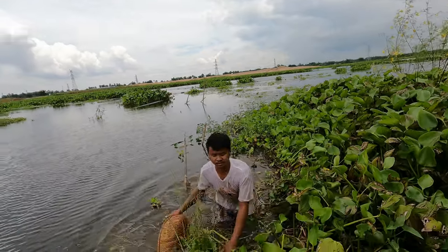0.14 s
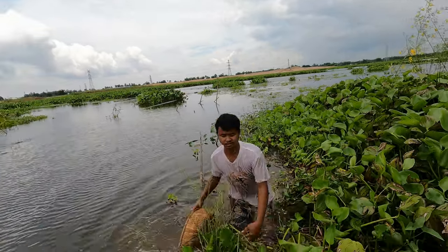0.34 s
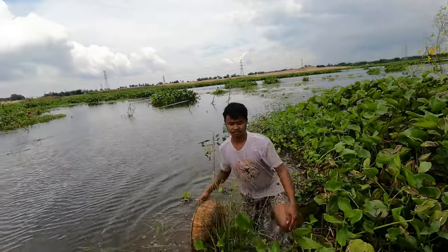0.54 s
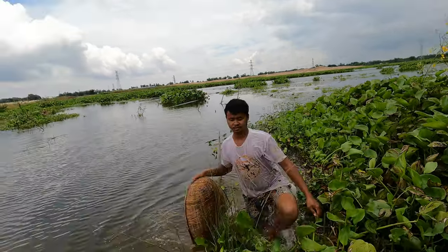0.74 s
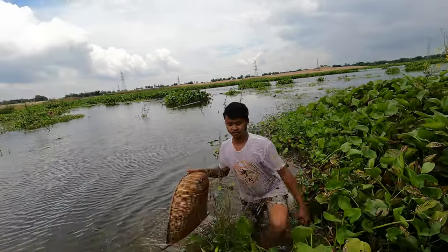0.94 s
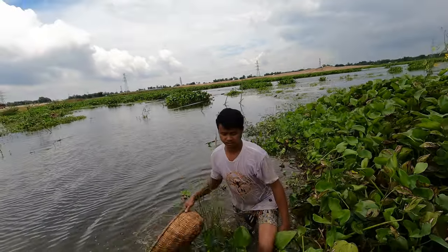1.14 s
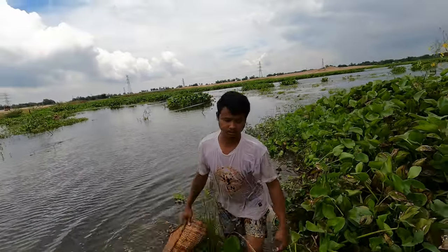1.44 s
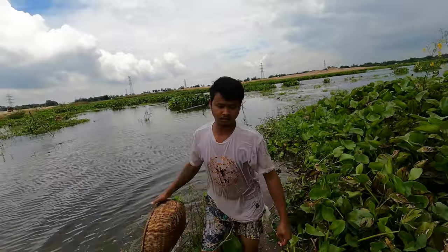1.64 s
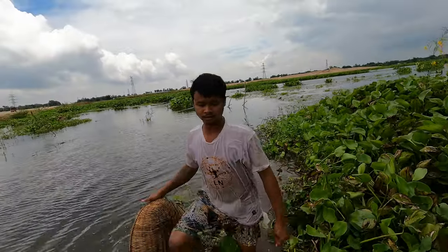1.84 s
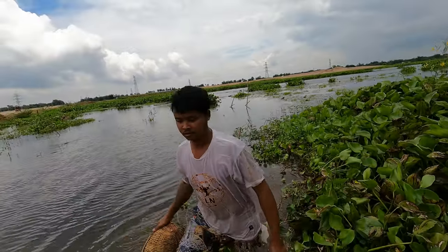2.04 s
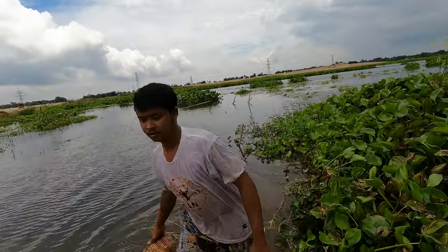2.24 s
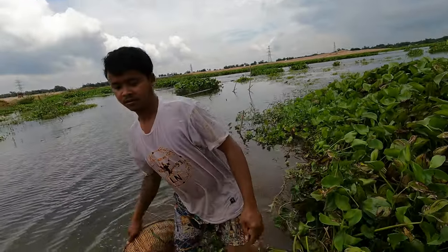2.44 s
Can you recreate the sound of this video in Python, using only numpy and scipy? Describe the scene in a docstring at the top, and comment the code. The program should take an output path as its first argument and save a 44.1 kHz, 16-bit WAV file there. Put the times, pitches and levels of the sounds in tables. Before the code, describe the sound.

Legs wade through shallow water, sloshing, gurgling and splashing unevenly over a low outdoor rumble.

```python
"""Someone wades through a shallow flooded field, over a low rumble and two wavering drones.
From the start the legs churn up clouds of ringing air bubbles, spray patters and fine drips tick.
Soon lumps of water slap the surface as short noise bursts, and single large bubbles plop as fading tones.
From about 0.8 s dull underwater thumps join in; they are lower bubble tones with a steady pitch."""
import sys
import numpy as np
from scipy import signal
from scipy.fft import rfft, irfft
from scipy.io import wavfile

SR = 44100
rng = np.random.default_rng(int(sys.argv[2]) if len(sys.argv) > 2 else 0)


def wav_out(sig):
    """Save sig, one row per channel (or a flat mono array), as 16-bit PCM at SR to the path in sys.argv[1]."""
    wavfile.write(sys.argv[1], SR, np.round(np.clip(np.atleast_2d(sig).T, -1, 1) * 32767).astype(np.int16))


N = 114660
TIME = np.arange(N) / SR
FREQ = np.fft.rfftfreq(N, 1 / SR)

# how strongly the water is stirred, before echo and panning:
# time_s, gurgle_level_db, slosh_level_db, spray_level_db
STIRRED_WATER = [(0.0, -53, -42.5, -43), (0.05, -55, -51.5, -49.5), (0.1, -52.0, -41, -45.5),
                 (0.12, -53.0, -44, -39), (0.17, -51.5, -46, -43), (0.27, -47.5, -40.0, -42.5),
                 (0.33, -50.5, -40.5, -46.5), (0.41, -54.0, -46, -50.0), (0.47, -47, -38, -44.5),
                 (0.51, -37, -41, -43), (0.55, -36.5, -34, -42.5), (0.61, -39.5, -33.5, -37),
                 (0.66, -34.5, -33, -34), (0.75, -40.5, -40, -37.5), (0.81, -42, -35.5, -37.5),
                 (0.88, -40, -38, -42), (0.97, -43, -39.5, -40.5), (1.08, -45.5, -41, -38.5),
                 (1.13, -50, -39.5, -39.5), (1.16, -47, -39, -39.5), (1.21, -52, -41, -39),
                 (1.27, -41, -35.0, -35.5), (1.35, -51, -43.5, -42), (1.47, -48, -43, -45.0),
                 (1.51, -51, -50, -47.5), (1.58, -54, -48, -47.5), (1.62, -45.5, -43, -48.5),
                 (1.7, -46.5, -46.5, -43), (1.75, -58, -36.5, -41), (1.8, -41, -34, -37),
                 (1.85, -49, -38, -38.5), (1.92, -42, -39, -35.5), (2.01, -41, -34.5, -31),
                 (2.06, -51, -40, -38.5), (2.11, -42.5, -36.5, -39), (2.17, -36, -37, -35),
                 (2.24, -53.5, -53.5, -40.5), (2.31, -56, -51, -45.5), (2.38, -43, -45.5, -48.5),
                 (2.44, -52, -49.0, -52.5), (2.49, -50, -50.5, -47.5), (2.52, -50, -42.5, -42.5),
                 (2.56, -56, -41.5, -47), (2.6, -43, -40, -41)]


def amp(db):
    """Turns decibels into a gain."""
    return 10 ** (np.asarray(db) / 20)


def unit(x):
    """Scales a sound to an rms (average strength) of 1."""
    return x / np.sqrt(np.mean(x ** 2) + 1e-20)


def curve(table, axis=1):
    """Draws straight lines through one column of a time table, giving a value for every sample."""
    rows = np.array(table)
    return np.interp(TIME, rows[:, 0], rows[:, axis])


def colour(x, shape):
    """Gives a sound the tone colour of a (pitch_hz, level_db) table, then scales it to rms 1."""
    hz, db = np.transpose(shape)
    gain_db = np.interp(np.log(FREQ + 1), np.log(hz), db)
    return unit(irfft(rfft(x) * amp(gain_db), N))


def drift(rate_hz):
    """Makes slow random motion of rms 1 by smoothing noise; a higher rate moves faster."""
    smoothing = np.exp(-(FREQ / rate_hz) ** 2)
    return unit(irfft(rfft(rng.standard_normal(N)) * smoothing, N))


def sides(pan_db):
    """Gives left and right gains; a positive level difference makes the left louder."""
    return amp(np.array([[.5], [-.5]]) * pan_db)


def add(mix, s, sound):
    """Mixes a sound in at time s, in seconds."""
    part = mix[..., max(round(s * SR), 0):][..., :sound.shape[-1]]
    part += sound[..., :part.shape[-1]]


def bubble(hz, cycles, rise):
    """A trapped air bubble rings and dies; its pitch may rise until it bursts at the surface."""
    onset_cycles, burst_after = 0.4, 2.8  # burst_after is in decay times
    u = TIME[:3000] * hz  # time counted in cycles
    age = u / cycles  # time counted in decay times
    fade = np.exp(-age) / np.hypot(1, (age / burst_after) ** 3)
    pitch_hz = hz * (1 + rise * np.minimum(age, 4))
    phase = 2 * np.pi * np.cumsum(pitch_hz) / SR
    return (1 - np.exp(-u / onset_cycles)) * fade * np.sin(phase)


def cloud(low_hz, high_hz, per_s, cycles, rise, spread_db, count=36):
    """Bubbles of many sizes and strengths ring together, born at random moments."""
    out = np.zeros(N)
    for hz in np.geomspace(low_hz, high_hz, count):
        length, glide = rng.standard_normal(2)
        born = rng.random(N) < per_s / count / SR
        strength = amp(spread_db * np.minimum(rng.exponential(1, N), 3))
        ring = unit(bubble(hz, cycles * np.exp(0.33 * length), rise * abs(glide)))
        out += signal.oaconvolve(born * strength, ring)[:N]
    return unit(out)


def churn():
    """Legs stir deep gurgles and a slosh of mid-sized bubbles, over a wash of countless tiny ones."""
    # tone colours of the gurgle and the slosh: pitch_hz, level_db (relative)
    gurgle_shape = [(150, -7), (280, 4.5), (500, 6.5), (700, 8.5), (1000, -21), (2000, -35)]
    slosh_shape = [(450, -11), (800, -5.5), (1050, 2), (1600, 0.5), (2400, -3), (3200, -5.5), (4500, -39.5),
                   (7000, -38)]
    wash_db = -6  # noise for the tiny bubbles, relative to each cloud before colouring
    gurgle = cloud(252.5, 827, per_s=320, cycles=1.1, rise=0.037, spread_db=3.5, count=16)
    gurgle += amp(wash_db) * rng.standard_normal(N)
    slosh = cloud(699, 4516, per_s=1900, cycles=5.1, rise=0.0974, spread_db=4, count=48)
    slosh += amp(wash_db) * rng.standard_normal(N)
    return (amp(curve(STIRRED_WATER, axis=1)) * colour(gurgle, gurgle_shape)
            + amp(curve(STIRRED_WATER, axis=2)) * colour(slosh, slosh_shape))


def spray():
    """Thrown droplets tick on the water in clumps and leave tiny ringing bubbles."""
    # tone colour of the spray: pitch_hz, level_db (relative)
    spray_shape = [(1000, -4), (2000, 6), (2800, -1), (4200, 0), (5500, -3), (7200, -4), (8500, -10.5),
                   (10500, -15.5), (12200, -13), (13500, -20), (15500, -46)]
    hits = rng.random(N) < 2600 / SR  # about 2600 droplets a second
    strength = amp(1.83 * np.minimum(rng.exponential(1, N), 3.6))
    ticks = hits * strength * rng.choice([-1, 1], N)
    fizz = cloud(2580, 9510, per_s=1300, cycles=8.3, rise=0.14, spread_db=1.5)
    hiss = rng.standard_normal((2, N))
    drops = unit(ticks) + amp(-2.5) * fizz + amp(-6) * hiss
    clumps = amp(1.8 * drift(70))
    return amp(curve(STIRRED_WATER, axis=3)) * colour(drops * clumps, spray_shape)


def drips():
    """Fine drips from wet clothes and a basket make tiny sharp ticks, each with a brief spatter."""
    # tone colour of the drips: pitch_hz, level_db (relative)
    drip_shape = [(1500, -27), (3500, 18), (6500, -1), (8500, -1), (10500, -7.5), (12200, 0), (13500, -27),
                  (15500, -24)]
    drips_per_s, spread_db, level_db, decay_s = 120, 3.8, -54.5, 0.0015
    strength = amp(spread_db * np.minimum(rng.exponential(1, N), 2.5))
    hits = (rng.random(N) < drips_per_s / SR) * strength
    fading = signal.lfilter([1], [1, -np.exp(-1 / (decay_s * SR))], hits)
    spatter = fading * rng.standard_normal(N)
    return amp(level_db) * colour(spatter, drip_shape)


def rumble():
    """Low outdoor rumble of shaped noise and two wavering sine drones, perhaps from a far engine."""
    # loudness of the sub-bass, the upper bass and the higher drone: time_s, level_db
    sub_level = [(0, -33.5), (.3, -34.5), (.55, -29), (.85, -26), (1.1, -29), (1.5, -27.5), (1.7, -27),
                 (2.2, -26), (2.42, -32.5), (2.52, -24), (2.6, -26.5)]
    bass_level = [(0, -31), (.1, -36.5), (.3, -32.5), (.45, -30.5), (.56, -36), (.68, -31.5), (.85, -30.5),
                  (1.1, -34), (1.22, -33.5), (1.5, -34.5), (1.7, -33.5), (1.86, -42), (2.0, -34),
                  (2.13, -34), (2.3, -35), (2.6, -36)]
    drone_level = [(0, -31), (.12, -31.5), (.19, -23), (.44, -33), (.53, -24), (.72, -22.5), (.93, -23.5),
                   (1.15, -31), (1.45, -30.5), (1.8, -32.5), (1.95, -32), (2.1, -31.5), (2.2, -28.5),
                   (2.38, -33), (2.6, -49)]
    # the deeper drone: time_s, pitch_hz, level_db
    deep_drone = [(0, 57.8, -28), (.14, 58.4, -26.5), (.24, 59, -33), (.4, 59, -26.5), (.6, 58.6, -37),
                  (1.5, 44.97, -39.5), (1.78, 34.56, -28), (1.95, 35.98, -27), (2.1, 40.3, -26.5),
                  (2.25, 35.2, -27), (2.42, 37, -36.5), (2.6, 39.9, -27)]
    # tone colours of the sub-bass and the upper bass: pitch_hz, level_db (relative)
    sub_shape = [(10, -58), (22, -0.5), (36, 3.5), (47, -4), (60, 4), (80, -12), (120, -7.5), (300, -66.5)]
    bass_shape = [(50, -53), (85, -14), (120, 1.5), (160, -5.5), (205, -5), (260, -14.5), (350, -26.5),
                  (700, -61.5)]
    # place of the sub-bass and deeper drone: time_s, left_minus_right_db
    sub_pan = [(0, 2.5), (.6, -5), (1.3, -2.5), (2, -7.5), (2.6, -3.5)]
    drone_hz = 93

    def noise(shape, apart_db):
        """Noise shared by both sides, plus some that differs between them."""
        shared = rng.standard_normal(N)
        return colour(shared + amp(apart_db) * rng.standard_normal((2, N)), shape)

    def tone(hz):
        """A sine of rms 1 whose pitch wavers at random."""
        wavering_hz = hz + 2.47 * drift(6.9)
        return np.sqrt(2) * np.sin(2 * np.pi * np.cumsum(wavering_hz) / SR)

    sub = amp(curve(sub_level)) * noise(sub_shape, apart_db=-5)
    sub += amp(curve(deep_drone, axis=2)) * tone(curve(deep_drone))
    bass = amp(curve(bass_level)) * noise(bass_shape, apart_db=-11.5) * sides(-1.3)
    drone = amp(curve(drone_level)) * tone(drone_hz)
    return sub * sides(curve(sub_pan)) + bass + drone


def slaps():
    """Lumps of water hit the surface with a short, bright splat of noise around one pitch."""
    # each slap: start_s, level_db (before the fades), centre_hz, decay_s
    slap_list = [(0.0209, -35.5, 4500, .003), (0.111, -35.5, 4830, .004), (0.193, -31.5, 5270, 0.0017),
                 (.446, -39, 5470, .0015), (0.527, -30, 2200, .004), (.533, -32, 5030, 0.0033),
                 (.642, -25.5, 3000, 0.0029), (.657, -26.5, 4000, .002), (0.67, -26.5, 2530, 0.0023),
                 (.8899, -31.5, 3600, 0.005), (1.1468, -27.5, 3320, 0.0069), (1.165, -30, 3430, 0.0051),
                 (1.268, -31.5, 4000, 0.0047), (1.47, -29.5, 2740, 0.0032), (1.642, -33.5, 3200, .002),
                 (1.7877, -26, 3200, .003), (1.8038, -25, 4440, 0.0026), (1.8095, -27, 7440, 0.0023),
                 (2.0083, -30, 2860, .009), (2.171, -25, 3650, 0.0032), (2.2252, -28, 5370, .002),
                 (2.2929, -22.5, 4000, 0.0046), (2.356, -30, 3215, 0.0023), (2.398, -27, 1320, 0.0031),
                 (2.5067, -34.5, 4955, 0.0047), (2.5145, -25, 3890, 0.0023), (2.5704, -32, 3900, 0.0028)]
    width_octaves, attack_s = 1, .0002
    out, t = np.zeros(N), TIME[:2048]
    octave = np.log2(np.fft.rfftfreq(len(t), 1 / SR) + 1)
    for start_s, level_db, centre_hz, decay_s in slap_list:
        distance = (octave - np.log2(centre_hz)) / width_octaves
        band = 1 / (1 + distance ** 2) ** 2
        burst = unit(irfft(rfft(rng.standard_normal(len(t))) * band))
        fade = np.exp(-t / decay_s) * (1 - np.exp(-t / attack_s))
        add(out, start_s, amp(level_db) * burst * fade)
    return out


def plops():
    """Large single bubbles ring and stand out of the slosh."""
    # each bubble: start_s, pitch_hz (at first), level_db (before the fades), decay_cycles,
    # pitch_rise (share of the first pitch per decay time)
    plop_list = [(0.0547, 1160, -28.5, 4, 0.0), (0.0799, 661, -34.5, 6.2, 0.43),
                 (0.2722, 2070, -24, 3.1, 0.14), (0.2915, 513, -25.5, 6.1, 0.3),
                 (0.335, 1048, -21.5, 6.3, 0.0), (0.3609, 1950, -28.5, 8.7, 0.04),
                 (0.4667, 1650, -23.5, 3.3, 0.057), (0.475, 670, -28, 3.8, 0.0031),
                 (0.5387, 1900, -19.5, 4.6, 0.08), (0.5551, 754, -21, 4.2, 0.25),
                 (0.5769, 2430, -25, 12, 0.0), (0.578, 530, -25, 10, 0.033),
                 (0.5891, 488, -14, 3.5, 0.0051), (0.6235, 320, -26, 2.3, 0), (0.6342, 1529, -21, 3.1, 0.0),
                 (0.6702, 1170, -20, 4, 0.0), (0.6793, 1590, -24, 7, 0.022),
                 (0.7017, 1616, -26, 6.2, 0.015), (0.7128, 3700, -16.5, 6.2, 0.19),
                 (0.729, 3460, -21.5, 5.9, 0.13), (0.7854, 490, -17, 1.7, 0.057),
                 (0.8121, 1872, -17, 2.5, 0.36), (0.8209, 1890, -26, 13, 0.033),
                 (0.8741, 970, -26.5, 7.9, 0.014), (0.8903, 3800, -27, 6, 0.0053),
                 (0.9093, 1200, -22, 5.6, 0.28), (0.971, 1560, -24.5, 3.7, 0.08),
                 (1.0139, 976, -27.5, 8.8, 0.21), (1.0385, 2350, -24.5, 4.1, 0.017),
                 (1.041, 1072, -19, 2.7, 0.082), (1.071, 2300, -23, 5.3, 0.04),
                 (1.0871, 1500, -17, 2.2, 0.0), (1.0874, 1170, -27, 16, 0.0044),
                 (1.1645, 1482, -29, 21.6, 0.16), (1.1811, 1650, -22, 3, 0.14),
                 (1.235, 695, -26.5, 3.2, 0.1), (1.2679, 1190, -23, 2.1, 0.14),
                 (1.2916, 2640, -23, 5.0, 0.052), (1.3167, 3200, -21.5, 8.6, 0.087),
                 (1.3712, 1280, -25, 5.9, 0.22), (1.5153, 1313, -23.5, 5.4, 0.034),
                 (1.5321, 1420, -21, 1.8, 0.012), (1.553, 3540, -29, 8, 0),
                 (1.5974, 1790, -28.5, 4.8, 0.018), (1.703, 3760, -28.5, 15.3, 0.11),
                 (1.7691, 1854, -22.5, 8.7, 0.13), (1.7697, 634, -26, 11, 0.017),
                 (1.7708, 949, -25.5, 11, 0.23), (1.8055, 1445, -20.5, 7.8, 0.034),
                 (1.8096, 883, -20.5, 10.7, 0.207), (1.8113, 604, -22.5, 4, 0.038),
                 (1.8725, 997, -19.5, 8.9, 0.04), (1.877, 1012, -18.5, 6.3, 0.021),
                 (1.8936, 955, -26.5, 11, 0.04), (1.9012, 3580, -18, 3.5, 0.0),
                 (1.938, 2240, -23, 6.2, 0.096), (2.0104, 2490, -18, 20, 0.04),
                 (2.0107, 985, -17, 4.2, 0.19), (2.0152, 1524, -23, 13, 0.028),
                 (2.0177, 2470, -11.5, 6.2, 0.074), (2.0361, 1064, -23, 3.8, 0.021),
                 (2.08, 2260, -24.5, 5.8, 0.046), (2.1198, 575, -22, 2.5, 0.057),
                 (2.1357, 344, -14, 0.96, 0.18), (2.1667, 1760, -22.5, 10.6, 0.04),
                 (2.1691, 706, -19, 2.3, 0.037), (2.207, 546, -27, 1.7, 0.26),
                 (2.2223, 1780, -25, 6.2, 0.031), (2.262, 3420, -24, 6, 0.1), (2.3368, 6950, -31, 11, 0),
                 (2.3555, 3700, -24, 3.6, 0.019), (2.3583, 1706, -28.5, 5.7, 0.023),
                 (2.3997, 710, -22, 2.4, 0.01), (2.4683, 2350, -27.5, 9.9, 0.11),
                 (2.5145, 1140, -21.5, 8.1, 0.08), (2.5689, 3547, -16.5, 5.6, 0.077)]
    out = np.zeros(N)
    for start_s, pitch_hz, level_db, decay_cycles, pitch_rise in plop_list:
        add(out, start_s, amp(level_db) * bubble(pitch_hz, decay_cycles, pitch_rise))
    return out


def thumps():
    """A leg pulls through the mud and a big pocket of water and air closes behind it, ringing low."""
    # each thump: start_s, pitch_hz, level_db (before the fades), decay_cycles
    thump_list = [(0.783, 149, -8.5, 1.9), (.812, 350, -24, 3.7), (0.818, 120, -15.5, 3.9),
                  (1.000, 131.5, -11, 1.6), (1.046, 328, -22.5, 1.7), (1.283, 149, -29, 1.8),
                  (1.325, 204, -24, 4.7), (1.6, 131, -14, 1.2), (1.637, 176, -8, 0.58),
                  (1.682, 174.2, -14.5, 0.96), (2.138, 270, -19, 1.15), (2.167, 261, -31, 1.6),
                  (2.468, 167.5, -22.5, 3.5)]
    out = np.zeros(N)
    for start_s, pitch_hz, level_db, decay_cycles in thump_list:
        add(out, start_s, amp(level_db) * bubble(pitch_hz, decay_cycles, rise=0))
    return out


def surroundings(x):
    """Body, basket and leaves scatter a brief echo; the two ears of the microphone differ a little."""
    echo_db, echo_decay_s = -10.5, .011
    width_db, width_decay_s = -23.5, 0.0011
    t = TIME[:4096]
    taps = rng.standard_normal((3, len(t)))
    tail = taps[:2] * np.exp(-t / echo_decay_s) * (t > .002)  # the echo waits 2 ms
    near = taps[2] * np.exp(-t / width_decay_s)
    echo = signal.oaconvolve(x, tail / np.linalg.norm(tail[0]), axes=1)[:, :N]
    side = signal.oaconvolve(x.mean(0), near / np.linalg.norm(near))[:N]
    return x + amp(echo_db) * echo + amp(width_db) * np.array([side, -side])


def placed(x):
    """Places the wader by ear timing and level: the right is ahead, and louder until near the end."""
    # timing between the ears: pitch_hz, left_lead_radians (negative when the right is ahead)
    ear_lead = [(100, -1.8), (1200, -0.1), (3500, -0.66), (5000, -0.21), (10000, -0.097), (13000, 0)]
    # level between the ears: time_s, left_minus_right_db
    wader_pan = [(0, -0.2), (.7, -2), (1.3, -0.8), (1.8, -1), (2.2, 0.5), (2.6, .3)]
    lead = np.interp(FREQ, *np.transpose(ear_lead))
    turn = np.exp(1j * np.array([[.5], [-.5]]) * lead)
    return irfft(rfft(x) * turn, N) * sides(curve(wader_pan))


def scene():
    """Lays the echoing, placed water sounds over the rumble."""
    water = churn() + spray() + drips() + slaps() + plops() + thumps()
    return placed(surroundings(water)) + rumble()


def record(dry):
    """Applies the microphone's treble roll-off, then the band limit."""
    top_hz, edge_hz = 12900, 15700
    soft = irfft(rfft(dry) / np.sqrt(1 + (FREQ / top_hz) ** 20), N)
    band_limit = signal.firwin(511, edge_hz, window=("kaiser", 9), fs=SR)
    return signal.oaconvolve(soft, band_limit[None], "same")


dry = scene()
out = record(dry)
wav_out(out)
```